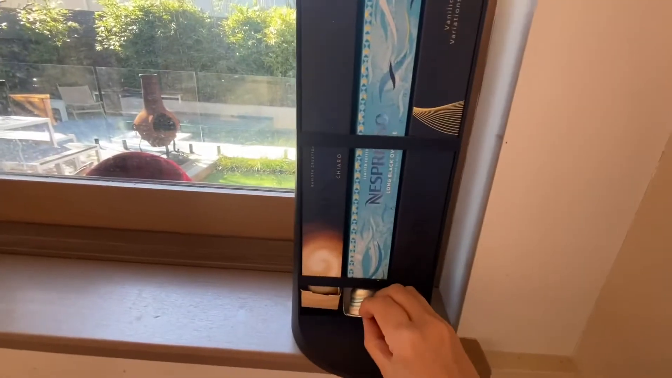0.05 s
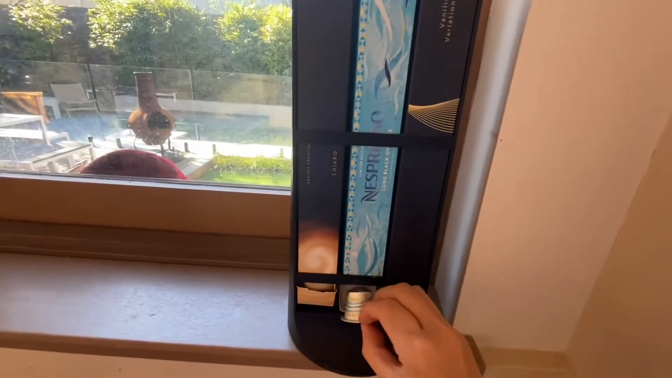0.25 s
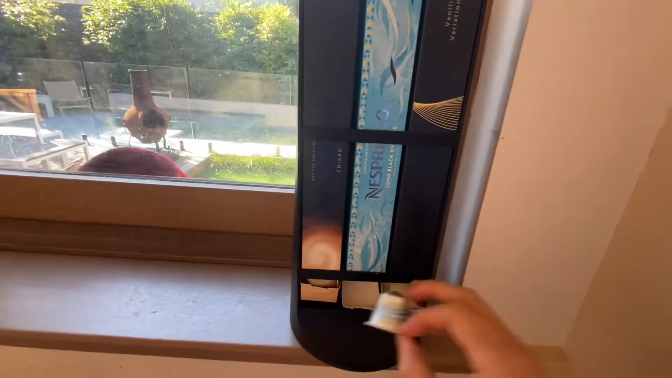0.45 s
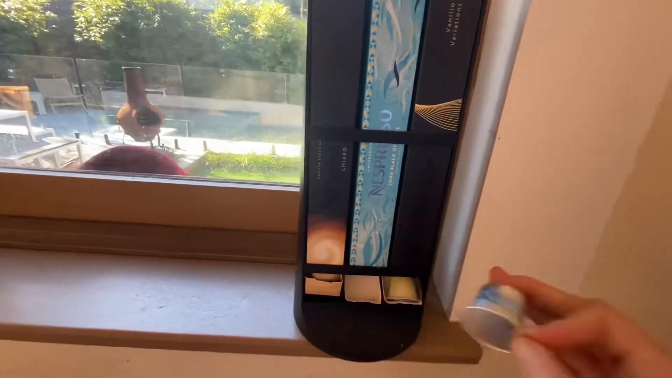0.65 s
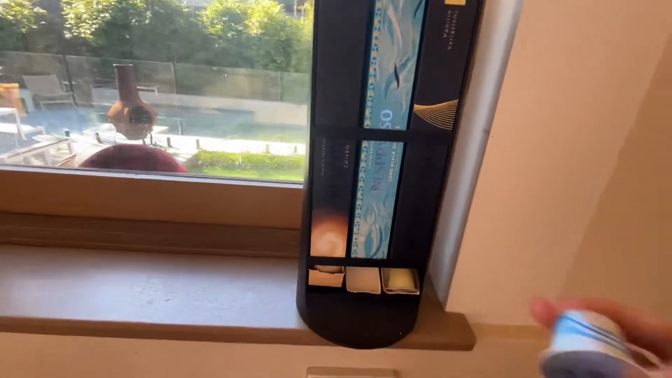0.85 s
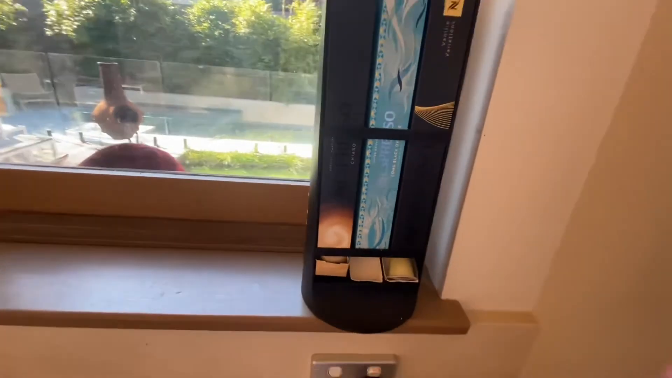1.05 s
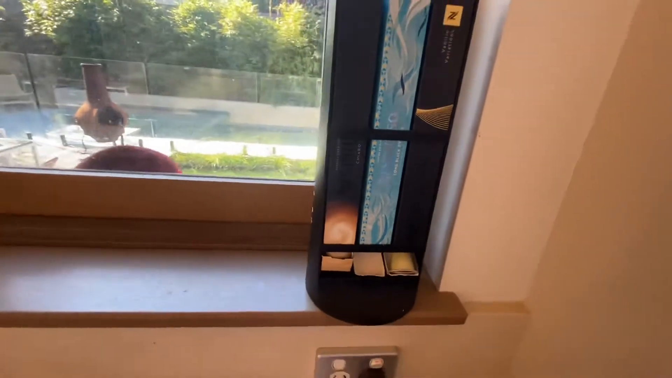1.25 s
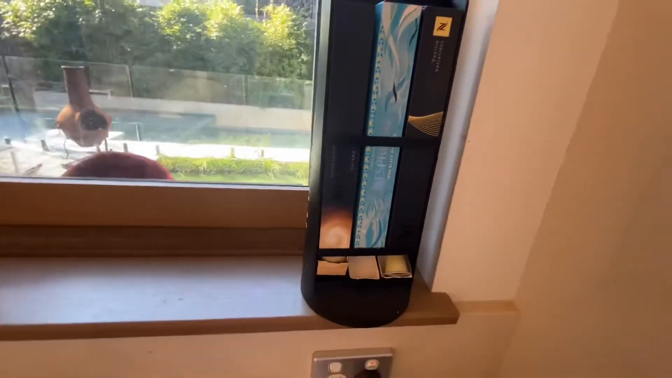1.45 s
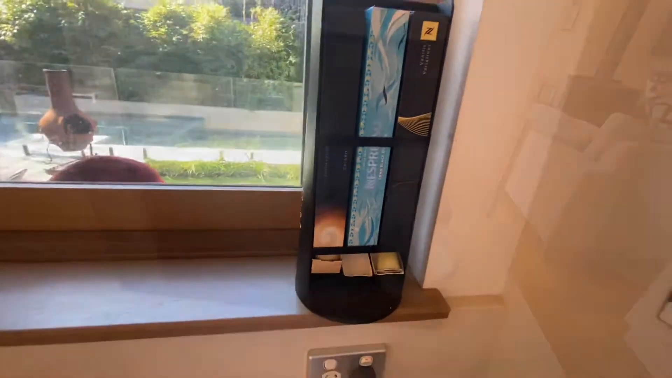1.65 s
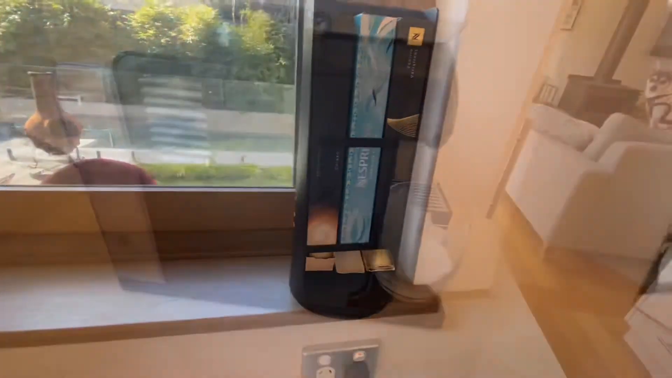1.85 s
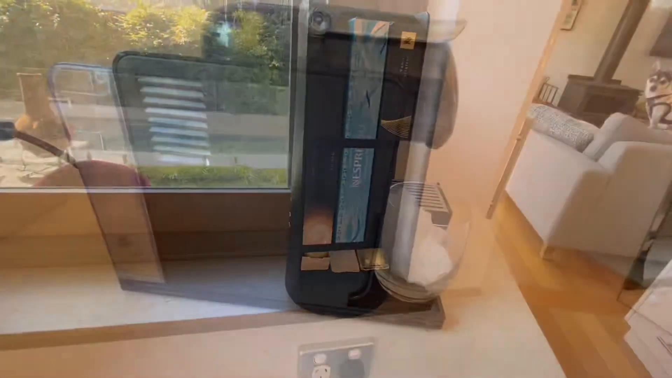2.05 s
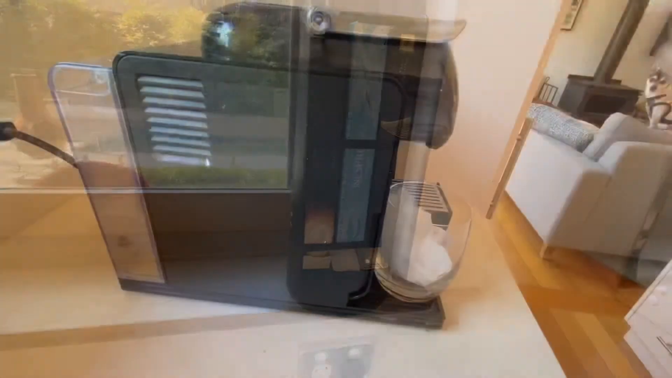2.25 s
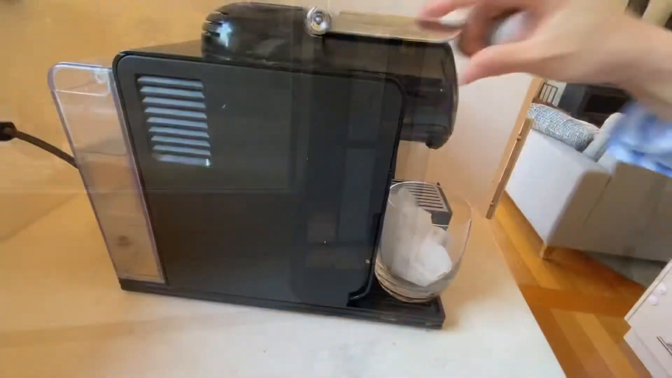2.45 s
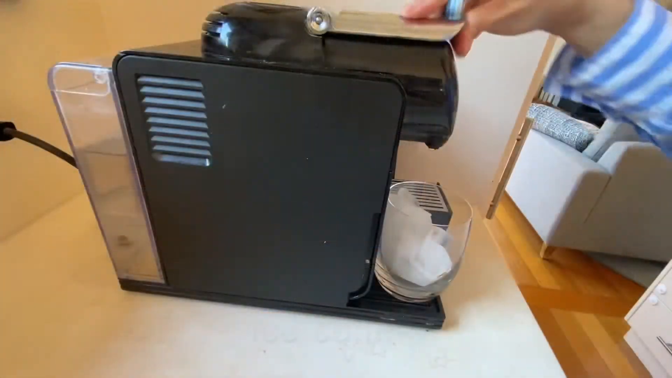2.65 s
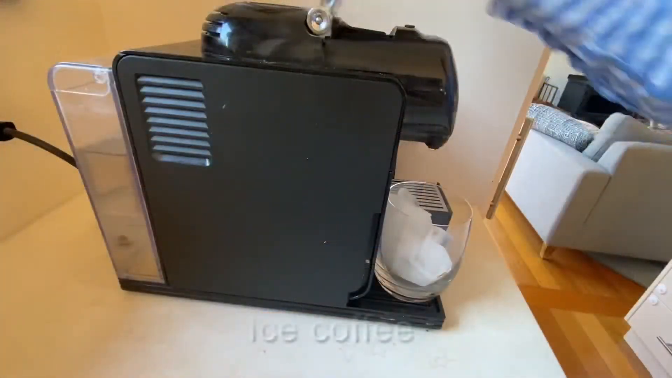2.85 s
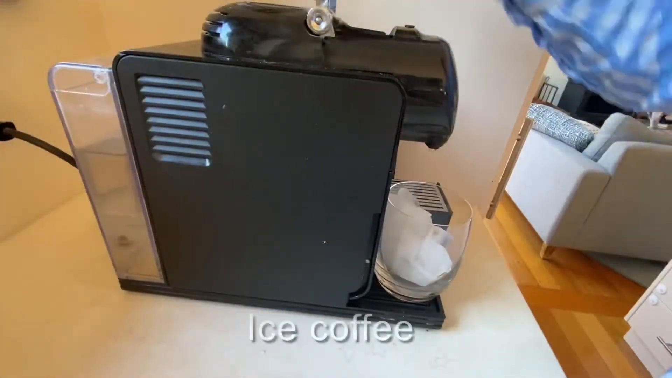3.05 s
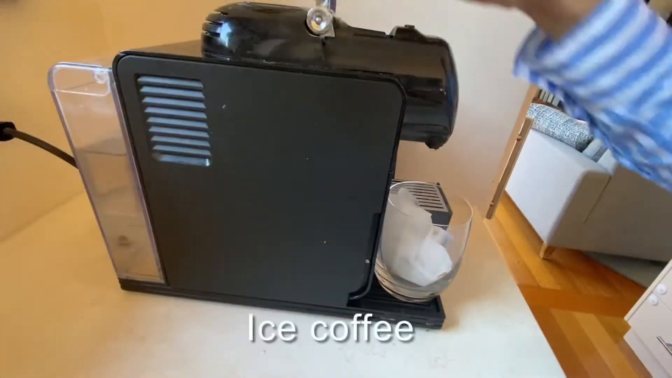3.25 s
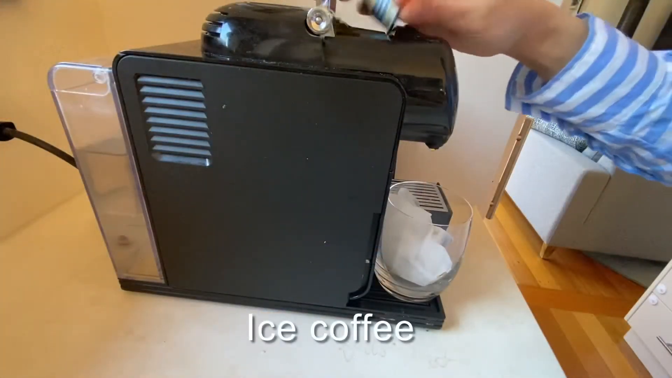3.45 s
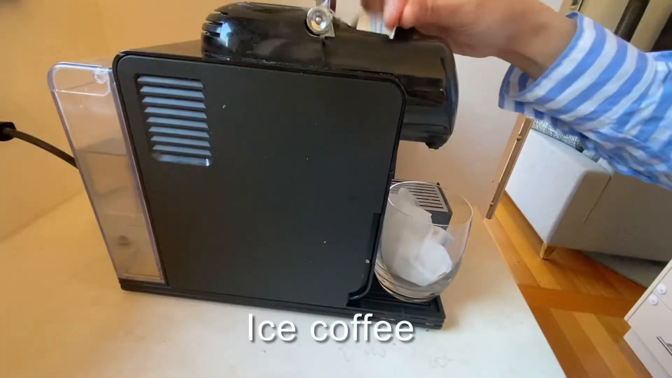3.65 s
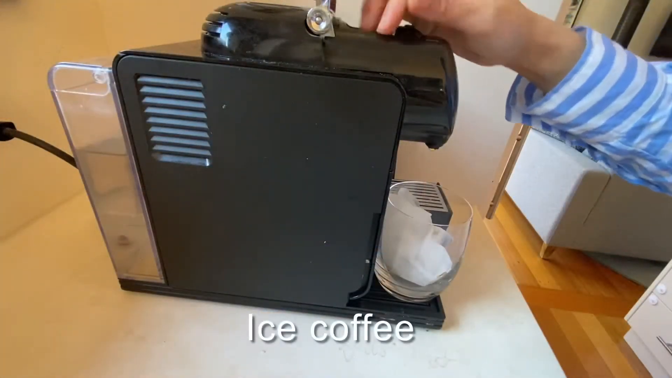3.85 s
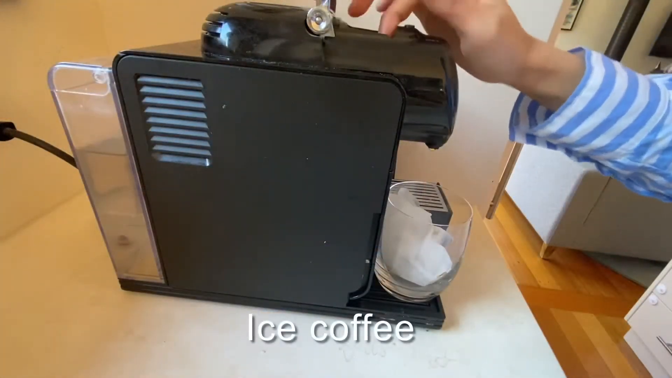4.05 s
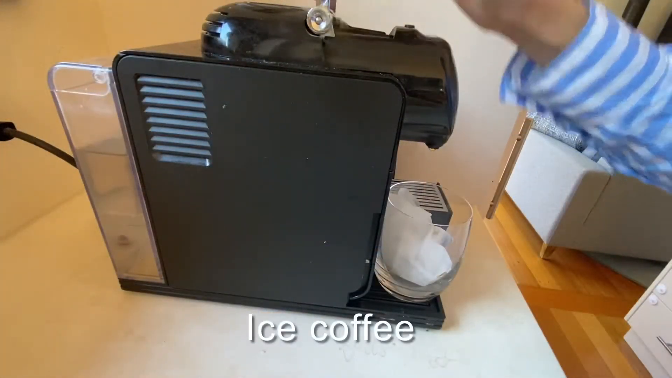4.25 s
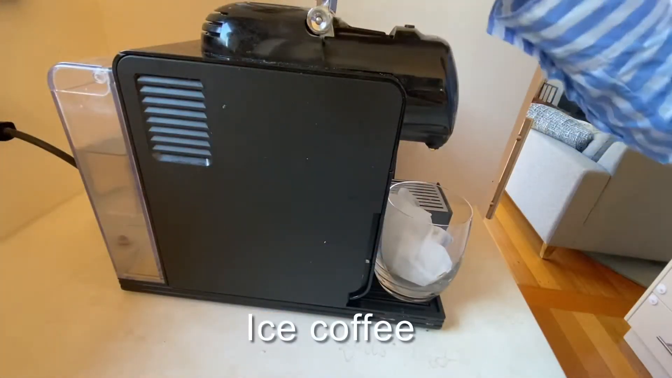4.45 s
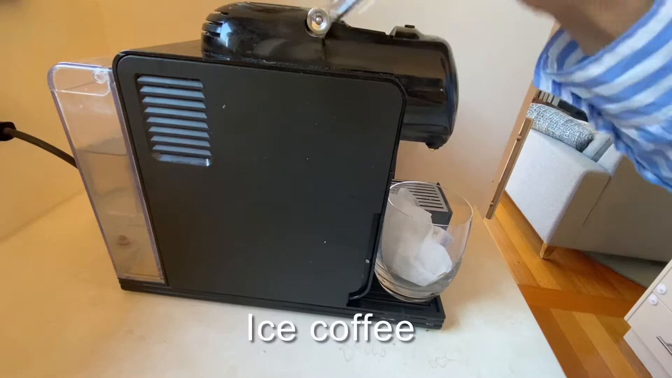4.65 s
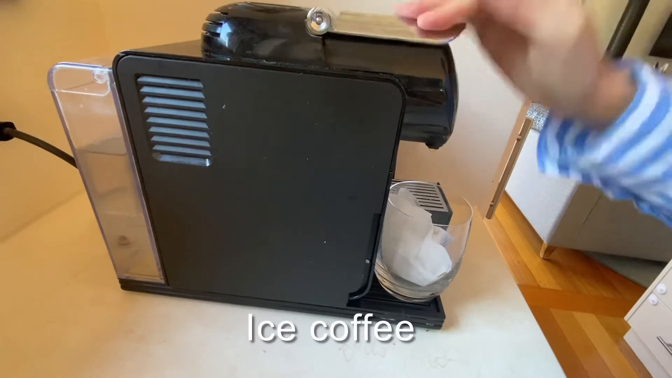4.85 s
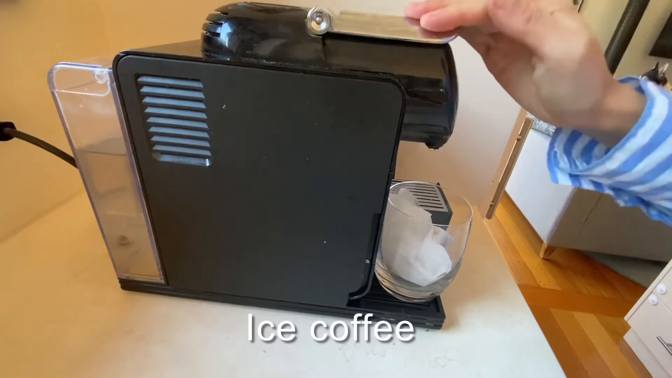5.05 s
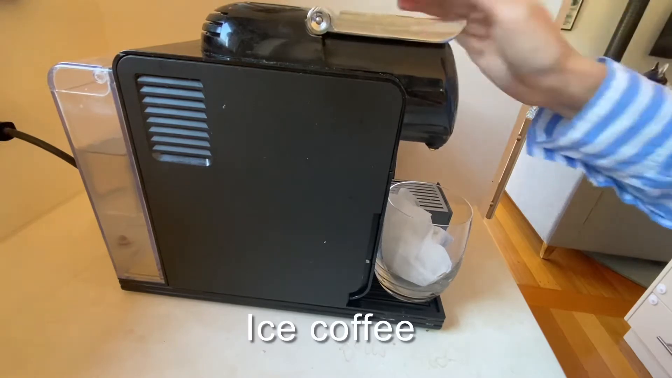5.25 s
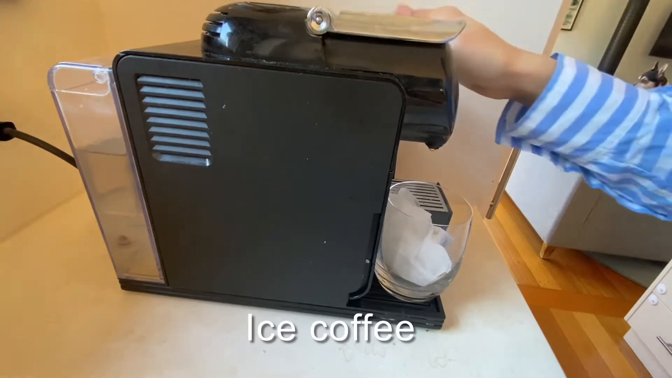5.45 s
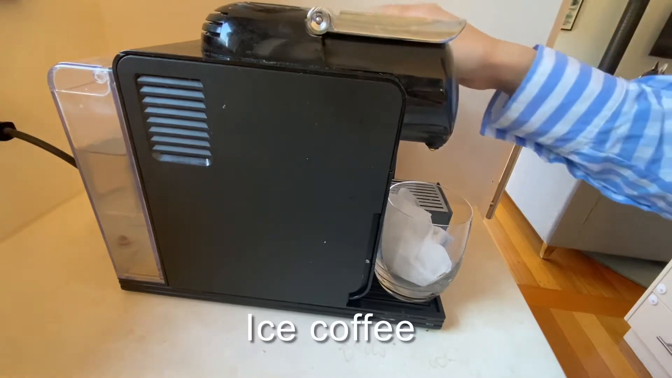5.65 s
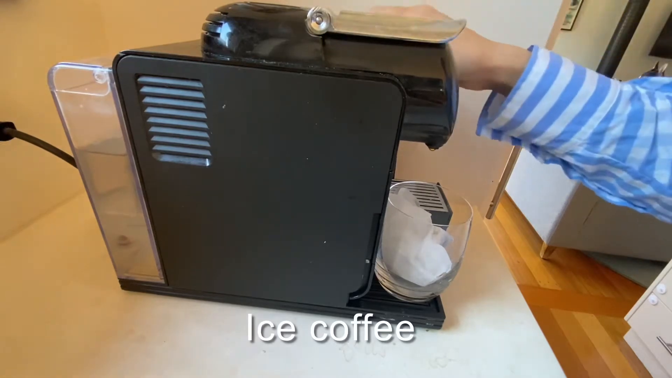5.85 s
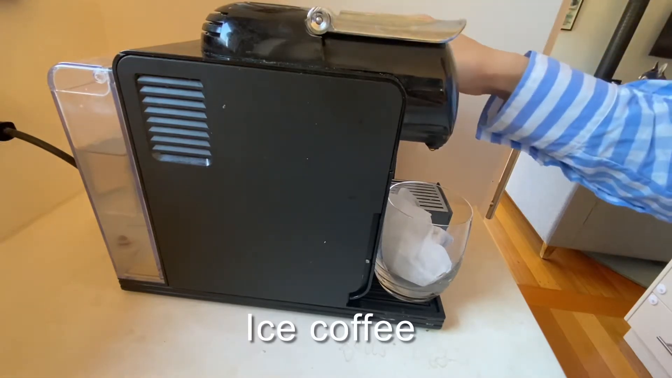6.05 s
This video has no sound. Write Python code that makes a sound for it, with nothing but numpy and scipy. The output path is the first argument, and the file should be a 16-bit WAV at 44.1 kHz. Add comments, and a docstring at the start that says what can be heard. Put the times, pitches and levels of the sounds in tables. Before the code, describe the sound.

In a quiet kitchen, a capsule knocks faintly in a plastic dispenser while a sleeve rustles and foil crinkles very softly. A coffee machine lever clicks upward and hits its stop with a sharp hollow crack. The capsule taps and rattles into the chute. The lever then clicks and creaks down, closing with the loudest clunk and a short metallic ring. A hand-held phone close by picks up low grip rumble.

```python
"""First a capsule knocks lightly in its dispenser, while fingertips brush it and a sleeve rustles close by.
Then the lever of a coffee machine is lifted, the capsule rattles into the chute and the lever is pressed
shut with a clunk. Contacts are short noise bursts that ring plastic shells; bending walls are brief sinking
tones, metal parts are decaying sines, and friction is made of many tiny kicks. All this is heard in a
kitchen from a hand-held phone, with rubs, grip rumble and quiet air as shaped noise."""
import sys
import numpy as np
from scipy import signal
from scipy.fft import rfft, irfft, next_fast_len
from scipy.io import wavfile
from scipy.ndimage import uniform_filter1d

SR = 44100
rng = np.random.default_rng(int(sys.argv[2]) if len(sys.argv) > 2 else 0)


def log_audio(samples):
    """Write samples as a 16-bit WAV file to the path given in sys.argv[1]."""
    # one column per channel
    frames = np.atleast_2d(samples).T
    # limit to full scale, then quantise
    limited = np.clip(frames, -1, 1)
    pcm = np.round(limited * 32767).astype(np.int16)
    wavfile.write(sys.argv[1], SR, pcm)


N = 269343
TIME = np.arange(N) / SR


def undb(db):
    """Decibels to gain."""
    return 10 ** (np.asarray(db) / 20)


def unit(x):
    """Scale to rms 1."""
    return x / np.sqrt(np.mean(x ** 2))


def fade(t, t60):
    """Exponential decay, 60 dB down after t60 seconds."""
    return np.exp(-np.log(1000) * t / t60)


def add(out, s, sound):
    """Mix a sound in at time s."""
    start = int(s * SR)
    out[:, start:start + sound.shape[1]] += sound[:, :N - start]


def band(x, lo_hz, hi_hz, order=3):
    """Causal band-pass."""
    edges = [lo_hz, min(hi_hz, SR / 2 - 1)]
    return signal.sosfilt(signal.butter(order, edges, "band", fs=SR, output="sos"), x)


def shape(x, hz, db):
    """Weight a sound by a curve of dB over Hz."""
    size = next_fast_len(N)
    log_hz = np.log(np.fft.rfftfreq(size, 1 / SR) + 1)  # + 1 avoids log(0)
    gain = undb(np.interp(log_hz, np.log(hz), db))
    return irfft(rfft(x, size) * gain, size)[..., :N]


def colour(x, points):
    """Shape a sound by (Hz, dB) points; rms 1."""
    return unit(shape(x, *np.transpose(points)))


def pair(size, likeness):
    """Noise at the two microphone ports, partly shared."""
    shared = np.clip(likeness, 0, 1)
    noise = rng.standard_normal((3, size))
    return np.sqrt(shared) * noise[0] + np.sqrt(1 - shared) * noise[1:]


def bursts(rows, attack_s, t60):
    """Gain over time of (s, dB) events that swell up to their moment and then die away."""
    gain = 0
    for s, db in rows:
        swell = np.exp(-(np.minimum(TIME - s, 0) / attack_s) ** 2)
        gain = gain + undb(db) * swell * fade(np.maximum(TIME - s, 0), t60)
    return gain


def resonate(x, modes):
    """A shell passes the push on and rings at its resonances."""
    return x + sum(undb(db) * signal.lfilter(*signal.iirpeak(hz, hz / width, SR), x) for hz, width, db in modes)


def ringing(modes, spread, size=2 * SR):
    """Freely decaying modes; each takes about a cycle to build up and reaches the two ports with its own phase."""
    t, out = TIME[:size], 0
    for hz, db, t60 in modes:
        phase = spread * rng.standard_normal() * np.array([[0], [1]])
        rise = 1 - np.exp(-t * hz)
        out = out + undb(db) * rise * fade(t, t60) * np.sin(2 * np.pi * hz * t + phase)
    return out


SAG_S = .007  # time constant of a bent wall relaxing


def flex(hz, sag, swell_s):
    """A thin wall bends and relaxes: a few cycles that swell, sink in pitch towards hz and are damped at once."""
    t = TIME[:SR // 16]
    pitch = hz * (1 + sag * np.exp(-t / SAG_S))
    swell = (t / swell_s * np.exp(1 - t / swell_s)) ** 2  # peaks at swell_s
    return (swell * np.sin(2 * np.pi * np.cumsum(pitch) / SR))[None]


def strike(s, db, touch):
    """One contact: its time, the level of each frequency range and its decay."""
    return (s, *(db + np.array(touch[:-1])), touch[-1])


def blend(hardness, touches):
    """Harder contacts are brighter, thinner and shorter."""
    soft, hard = np.array(touches)
    return soft + np.clip(hardness, 0, 1) * (hard - soft)


# The four parts of a contact: body, knock, clack and tick. Each row: low edge in Hz, high edge in Hz,
# ring length as a multiple of the contact's, likeness at the two ports from 0 to 1.
CONTACT_RANGES = [(167, 640, 1.3, 0.8), (642, 1790, 1.2, 0.5), (1660, 4750, 1.0, 0), (6200, 15600, 0.62, 0)]


def contacts(rows, modes, skirt_db=-24, swell=.045, grain_db=1.5, grain_s=.0006):
    """Each contact is a chatter of tiny collisions that swells and dies fast; it rings the shell from body to tick."""
    out, t = np.zeros((2, N)), TIME[:SR // 4]
    table = np.array(rows)
    t60 = table[:, -1, None, None]
    # the collisions differ in strength from one moment to the next
    strength = undb(grain_db * rng.standard_normal((len(rows), 1, len(t))))
    strength = strength[..., (t / grain_s).astype(int)]
    for k, (lo_hz, hi_hz, ring, likeness) in enumerate(CONTACT_RANGES):
        # longer contacts take longer to build up
        envelope = fade(t, ring * t60) * (1 - np.exp(-t / (swell * t60)))
        chatter = np.array([pair(len(t), likeness) for _ in rows]) * envelope * strength
        skirt = undb(skirt_db) * band(chatter, lo_hz, hi_hz, order=1)  # faint sound beyond the range
        sounds = resonate(band(chatter, lo_hz, hi_hz) + skirt, modes)
        for row, sound in zip(table, sounds):
            energy = np.mean(fade(t, ring * row[-1]) ** 2)
            # start early by the build-up time
            add(out, row[0] - swell * row[-1], undb(row[1 + k]) * unit(sound) * np.sqrt(energy))
    return out


# Clicks of the linkage and the hand on the machine. Each row: time in seconds, level in dB,
# hardness from 0 to 1, ring of the shell in dB.
LEVER_CLICKS = [(2.469, -52, 0.38, -62.5), (2.603, -46, 0.73, -63), (2.695, -36.5, 0.98, -44.5),
                (2.706, -34.5, 0.06, -40.5), (2.728, -34, 0, -37), (2.757, -29.5, 0.38, -32),
                (2.771, -36, 0.01, -41), (2.791, -37, 0.12, -45.5), (2.846, -33.5, 0.3, -34),
                (2.883, -27.5, 0.52, -32.5), (4.386, -48.5, 0.05, -58), (4.417, -30.5, 0.35, -31),
                (4.456, -28.5, 0.2, -22), (4.488, -31, 0.07, -33), (4.495, -25.5, 0.48, -33.5),
                (4.553, -36.5, 0.83, -42), (4.6, -21.5, 0.4, -26.5), (4.626, -26, 0.32, -28.5),
                (4.634, -26.5, 0.53, -25.5), (4.646, -36, 0.11, -31.5), (4.669, -38.5, 0.98, -42.5),
                (4.818, -24, 0.61, -12.5), (5.534, -63, 0.06, -75), (5.835, -65, 0.01, -78)]
# How a soft and then a hard click lands. Each row: body, knock, clack and tick in dB relative to the click,
# then decay time (t60) in seconds.
LEVER_TOUCH = [(-1, 0.5, -17, -36.5, .06), (-10, -2.5, 1, 8.5, .03)]
# The lever hits its end stop, open and then shut. Each row: time in seconds, crack in dB, thud in dB,
# decay time of the thud in seconds.
STOPS = [(2.8917, -6, -27.5, .07), (4.82, -4.5, -13, .06)]
# The crack at a stop: body, knock, clack and tick in relative dB, then decay time in seconds.
CRACK_TOUCH = (-14, -6, -10.5, -14, 0.11)
# The thud at a stop: body, knock, clack and tick in relative dB; its decay depends on the stop.
THUD_TOUCH = (3, -1.5, -7.5, -24.5)
THUD_LAG_S = .006
LATCH_S, LATCH_DB, LATCH_HARDNESS = 4.852, -20, 0.78
# Resonances of the plastic housing. Each row: pitch in Hz, width in Hz, strength in dB.
HOUSING = [(285, 76, 8), (576, 13, 3.5), (735, 59, 0), (930, 110, 4), (1150, 300, -4.5), (2190, 140, -5.5),
           (4630, 360, -4), (10400, 1500, 6.5)]


def lever():
    """The linkage clicks along its travel; at each end stop a crack is followed by a thud; last the latch drops."""
    hits = [strike(s, db, blend(hardness, LEVER_TOUCH)) for s, db, hardness, _ in LEVER_CLICKS]
    for s, crack_db, thud_db, thud_t60 in STOPS:
        hits.append(strike(s, crack_db, CRACK_TOUCH))
        hits.append(strike(s + THUD_LAG_S, thud_db, (*THUD_TOUCH, thud_t60)))
    hits.append(strike(LATCH_S, LATCH_DB, blend(LATCH_HARDNESS, LEVER_TOUCH)))
    return contacts(hits, HOUSING)


FLEX_SWELL_S, FLEX_SAG = 0.0021, 0.13  # time to its peak; share by which it starts sharp
# A click flexes the housing too: middle pitch, its scatter, level relative to the click, loss when it is hard.
CLICK_HZ, CLICK_SCATTER, CLICK_DB, CLICK_HARD_DB = 733, 0.14, -4, -3.5
# The housing flexes under each stop: it gives, takes the blow and rebounds.
# Each row: time in seconds, pitch it sinks towards in Hz, level in dB.
FLEXES = [(2.884, 1100, -19), (2.8906, 873, -4), (2.893, 1354, -13.5), (2.895, 523, -17), (4.8192, 834, -2),
          (4.8234, 253, -6), (4.828, 701, -15.5)]


def knocks():
    """The hollow knock of the housing: strong at the end stops, light under each click of the linkage."""
    out = np.zeros((2, N))
    for s, hz, db in FLEXES:
        add(out, s, undb(db) * flex(hz, FLEX_SAG, FLEX_SWELL_S))
    for s, db, hardness, _ in LEVER_CLICKS:
        hz = CLICK_HZ * np.exp(CLICK_SCATTER * rng.standard_normal())
        add(out, s, undb(db + CLICK_DB + CLICK_HARD_DB * hardness) * flex(hz, FLEX_SAG, FLEX_SWELL_S))
    return out


# Modes of the shell around the linkage, before each click varies them.
# Each row: pitch in Hz, level in dB relative to the click's ring, decay time in seconds.
SHELL = [(905, -1, .06), (1230, -7, .03), (2260, -12, .022)]


def clacks(pitch_scatter=0.03, scatter_db=3.0):
    """Each click leaves a short woody ring in the shell, a little different as the linkage moves on."""
    out = np.zeros((2, N))
    for s, _, _, ring_db in LEVER_CLICKS:
        modes = []
        for hz, db, t60 in SHELL:
            varied_hz = hz * (1 + pitch_scatter * rng.standard_normal())
            modes.append((varied_hz, db + scatter_db * rng.standard_normal(), t60))
        add(out, s, undb(ring_db) * ringing(modes, spread=0.38, size=SR // 4))
    return out


# Modes of the lever's metal parts. Each row: pitch in Hz, level in dB, decay time in seconds.
METAL = [(2254, -33, 0.46), (3520, -23, 0.14), (4600, -29, 0.12), (7170, -43, 0.24), (10456, -34, 0.18)]


def latch():
    """The latch dropping home rings the lever's metal parts."""
    out = np.zeros((2, N))
    add(out, LATCH_S, ringing(METAL, spread=.5))
    return out


# Modes of the machine on the counter. Each row: pitch in Hz, relative level in dB, decay time in seconds.
STAND = [(57.7, -25.5, 0.55), (96.7, -8.5, 0.13), (116, -21.5, 0.16), (280, -18, 0.2), (295, -35, .69),
         (554, -27.5, 0.23), (882, -33.5, 0.58), (920, -36, 0.62)]
# Modes of the drip tray and the glass on it, which ring on after a jolt.
# Each row: pitch in Hz, relative level in dB, decay time in seconds.
TRAY = [(436.5, -47, 1.9), (904, -53, 1.7)]
# Jolts that rock the machine. Each row: time in seconds, strength in dB.
JOLTS = [(2.77, -21.5), (2.895, -15.5), (4.414, -23), (4.63, -22), (4.824, 0.5)]


def clunks(modes):
    """Jolts set the modes of the machine, or of its tray, ringing."""
    out = np.zeros((2, N))
    rocking = ringing(modes, spread=.2)
    for s, db in JOLTS:
        add(out, s, undb(db) * rocking)
    return out


# The capsule knocks in the dispenser and tumbles down the chute. Each row: time in seconds, level in dB,
# hardness from 0 to 1, ping of the lid in dB.
CAPSULE_BUMPS = [(0.08, -52.5, 0.1, -52), (0.228, -44, 0.37, -65), (0.24, -43.5, 0.61, -60),
                 (2.186, -62, 0, -51), (3.606, -33.5, 0.87, -29.5), (3.616, -40.5, 0.1, -54),
                 (3.651, -40, 0.7, -29.5), (3.669, -27, 0.83, -31), (3.683, -29.5, .95, -34),
                 (3.695, -25, .85, -39), (3.702, -35.5, .5, -31), (4.116, -46.5, 0.55, -45)]
# How a soft and then a hard bump lands. Each row: body, knock, clack and tick in relative dB,
# then decay time in seconds.
CAPSULE_TOUCH = [(-5, 1, -16, -21, 0.17), (-12.5, -5, -0.5, -2.5, .016)]
# The capsule's rim taps the mouth of the chute. Each row: time in seconds, level in dB.
RIM_TAPS = [(3.4398, -31), (3.4923, -35.5), (3.589, -29), (3.691, -27.5)]
# How a rim tap lands: body, knock, clack and tick in relative dB, then decay time in seconds.
RIM_TOUCH = (-22, -8, -18, 1, .013)
# Resonances of the chute. Each row: pitch in Hz, width in Hz, strength in dB.
CHUTE = [(425, 300, 2.5), (2348, 1800, -0.5), (3736, 1000, -3), (4810, 400, 3.5), (10300, 1500, 1)]
# The foil lid pings at a rim tap: pitch it sinks to, share it starts sharp, time to its peak, level re the tap.
PING_HZ, PING_SAG, PING_SWELL_S, PING_DB = 713, 0.72, 0.0028, -2


def capsule(tumble_hz=830, tumble_sag=.38, pitch_scatter=0.12):
    """The capsule taps with its thin rim and knocks with its whole shell; every contact pings the lid."""
    taps = [strike(s, db, RIM_TOUCH) for s, db in RIM_TAPS]
    bumps = [strike(s, db, blend(hardness, CAPSULE_TOUCH)) for s, db, hardness, _ in CAPSULE_BUMPS]
    out = contacts(taps + bumps, CHUTE, skirt_db=-24.5, grain_db=4.5)
    for s, db in RIM_TAPS:
        add(out, s, undb(db + PING_DB) * flex(PING_HZ, PING_SAG, PING_SWELL_S))
    for s, _, _, ping_db in CAPSULE_BUMPS:
        hz = tumble_hz * np.exp(pitch_scatter * rng.standard_normal())
        add(out, s, undb(ping_db) * flex(hz, tumble_sag, PING_SWELL_S))
    return out


RIM_RATTLE_DB, RIM_RATTLE_T60_S = -18, 0.12  # level relative to the tap, decay time
# Resonances of the capsule's rim. Each row: pitch in Hz, width in Hz, strength in dB.
RIM = [(5690, 180, -2), (6650, 370, -4), (8500, 1400, -4)]


def rim_rattle(grain_s=.0013):
    """After a tap the rim chatters against the chute, so its ring is short, rough and broken."""
    strength = undb(5 * rng.standard_normal(N))
    grains = pair(N, 0) * strength[(TIME / grain_s).astype(int)]
    ring = unit(resonate(grains, RIM) - grains)  # the ring alone, without the push
    return undb(RIM_RATTLE_DB) * ring * bursts(RIM_TAPS, grain_s, RIM_RATTLE_T60_S)


LOAD_DB_PER_S, LET_GO_T60_S = 45, 0.043
# Pushes on the linkage; friction grows with the load until a part gives way.
# Each row: start in seconds, end in seconds, final level in dB.
PUSHES = [(2.7, 2.879, -40), (4.408, 4.651, -41), (4.68, 4.82, -53.5)]


def load():
    """Gain of the friction: it climbs steadily through each push and collapses at the end."""
    gain = 0
    for start, end, db in PUSHES:
        climb = undb(db + LOAD_DB_PER_S * np.minimum(TIME - end, 0))
        gain = gain + (TIME > start) * climb * fade(np.maximum(TIME - end, 0), LET_GO_T60_S)
    return gain


PIERCE_S = 4.3  # from here on the lever drives a capsule


def grind(slips_per_s=1900, scatter_db=0.5, lo_hz=230, hi_hz=1250, free_db=-16, loaded_db=-7.5, scrape_hz=5000):
    """Plastic sticks and slips in its guides: uneven little kicks into the housing, harsher when pushing a capsule."""
    moments = rng.random(N) < slips_per_s / SR
    slips = moments * undb(scatter_db * rng.standard_normal(N)) * pair(N, 1.0)
    scrape = undb(np.where(TIME > PIERCE_S, loaded_db, free_db)) * band(slips, hi_hz, scrape_hz)
    push = band(slips, lo_hz, hi_hz, order=2) + scrape
    return unit(resonate(push, HOUSING)) * load()


def judder(slips_per_s=130, slip_hz=640, pitch_scatter=0.22, slip_db=4):
    """Under load the guides let go in uneven jerks; each flexes the housing at another pitch, making a creak."""
    out, force = np.zeros((2, N)), load()
    moments = np.flatnonzero((rng.random(N) < slips_per_s / SR) & (force > 1e-4))
    for i, chance in zip(moments, rng.standard_normal(N)):
        hz = slip_hz * np.exp(pitch_scatter * chance)
        add(out, i / SR, force[i] * undb(slip_db) * flex(hz, FLEX_SAG, FLEX_SWELL_S))
    return out


RUB_ATTACK_S, RUB_T60_S = 0.012, 0.12
# The foil slips under the fingers or along the chute. Each row: time in seconds, level in dB.
FOIL_RUBS = [(1.443, -61), (1.572, -55.5), (1.588, -60.5), (1.62, -62), (1.645, -60), (3.505, -77),
             (3.655, -45.5)]
# Resonances of the foil cup. Each row: pitch in Hz, width in Hz, strength in dB.
FOIL = [(4370, 1600, 11.5), (6600, 300, 14), (9400, 1300, 7)]


def crinkle(lo_hz=3400, hi_hz=11000, grain_db=3, grain_s=0.00078):
    """The foil capsule is rubbed: fine, uneven grains that ring its cup."""
    strength = undb(grain_db * rng.standard_normal(N))
    grains = pair(N, 0.16) * strength[(TIME / grain_s).astype(int)]
    return unit(resonate(band(grains, lo_hz, hi_hz), FOIL)) * bursts(FOIL_RUBS, RUB_ATTACK_S, RUB_T60_S)


SCUFF_ATTACK_S, SCUFF_T60_S = 0.043, 0.29
# Fingertips brush the dispenser, the capsule and the machine. Each row: time in seconds, level in dB.
SCUFFS = [(.13, -71.5), (1.22, -66.5), (4.16, -65)]


def scuffs(lo_hz=1050, hi_hz=2050):
    """Skin brushes over card and plastic: a soft, hollow rub that trails away."""
    return unit(band(pair(N, 0.4), lo_hz, hi_hz)) * bursts(SCUFFS, SCUFF_ATTACK_S, SCUFF_T60_S)


SLEEVE_REST_DB = -90.5
# Arm movements that rub the sleeve. Each row: time of fastest motion in seconds, length in seconds, level in dB.
REACHES = [(0.12, 0.44, -70), (0.692, 0.49, -66.5), (1.347, 0.61, -65), (2.599, 0.93, -67),
           (3.344, 0.37, -75)]


def arm_speed():
    """Gain of the rubbing: each reach speeds up and slows down in a bell shape."""
    reaches = sum(undb(db) * np.exp(-(2 * (TIME - s) / length) ** 2) for s, length, db in REACHES)
    return undb(SLEEVE_REST_DB) + reaches


# Tone of the rubbed cloth. Each row: frequency in Hz, relative level in dB.
CLOTH = [(200, -10), (700, 1), (1700, 4), (2700, 0), (10000, -7), (12000, -10.5), (13500, -27)]


def sleeve(flutter_db=1.5):
    """Fibres catch and let go: a hiss with a fine, uneven grain."""
    flutter = unit(uniform_filter1d(rng.standard_normal(N), SR // 60))
    return colour(pair(N, 0.083) * undb(flutter_db * flutter), CLOTH) * arm_speed()


GRIP_ATTACK_S, GRIP_T60_S, GRIP_REST_DB = 0.048, 1, -75
# The hand shifts its grip on the phone. Each row: time in seconds, level in dB.
GRIPS = [(.16, -60), (.71, -55.5), (1.04, -51.5), (1.11, -62.5), (1.31, -76), (2.19, -63), (2.48, -56),
         (3.125, -44.5), (3.29, -51)]
# Tone of the hand's rumble. Each row: frequency in Hz, relative level in dB.
RUMBLE = [(25, -12), (55, 5), (80, -5.5), (150, -14.5), (400, -55)]


def handling():
    """The hand rumbles straight into the phone: a low noise that swells at each shift of grip."""
    grip = undb(GRIP_REST_DB) + bursts(GRIPS, GRIP_ATTACK_S, GRIP_T60_S)
    return colour(pair(N, 0.97), RUMBLE) * grip


AIR_DB = -64
# Tone of the quiet kitchen. Each row: frequency in Hz, relative level in dB.
AIR = [(30, -21), (54, -5), (88, 4), (130, -5), (300, -22.5), (2500, -39), (7000, -40.5), (11500, -51),
       (14000, -61.5)]


def quiet_air():
    """The quiet kitchen: a steady, mostly low noise, nearly separate at the two ports."""
    return undb(AIR_DB) * colour(pair(N, 0.19), AIR)


# Kitchen reverberation. Each row: frequency in Hz, relative level in dB, decay time in seconds.
KITCHEN = [(79.6, -22.5, 0.89), (286, -10, 0.73), (555, -13.5, 0.8), (2050, -14, 0.79), (4600, -10, 0.64),
           (7800, -20.5, 0.93), (12000, -32.5, 0.8)]


def kitchen(x, early_db=-11, early_t60=0.27, gap_s=0.0067, build_s=0.0038):
    """Quick reflections from counter and walls, and a diffuse tail whose decay time varies with frequency."""
    t = TIME[:SR]
    hz, db, t60 = np.transpose(KITCHEN)
    edges = np.geomspace(40, 17000, 13)
    noise, tail = rng.standard_normal((2, SR)), 0
    for lo, hi in zip(edges, edges[1:]):
        where = np.log(lo * hi) / 2  # middle of the band on a log scale
        envelope = fade(t, np.interp(where, np.log(hz), t60)) * (1 - np.exp(-t / build_s))
        gain = undb(np.interp(where, np.log(hz), db))
        tail = tail + gain * band(rng.standard_normal((2, SR)), lo, hi) * unit(envelope)
    early = undb(early_db) * band(noise * unit(fade(t, early_t60) * (t > gap_s)), 170, 14000, order=1)
    return signal.fftconvolve(x, (early + tail) / np.sqrt(SR), axes=1)[:, :N]


def left_leads(x, lag_s=.0003):
    """The sound reaches the right port a little later."""
    return np.array([x[0], np.interp(TIME - lag_s, TIME, x[1])])


# The phone's two ports. Each row: frequency in Hz, response in dB, left minus right in dB.
PORTS = [(90, 3, 3), (280, 1.5, -3.5), (900, -1, 3.5), (2150, 0, 1.5), (4450, -3, 3.5), (6600, 3.5, 3.5),
         (9650, -2, -5), (11860, -1, -1), (13300, -13, -0.5), (15000, -5.5, 0.5)]


def ports(x):
    """The side facing the machine hears more of its midrange; both ports have a dip in the top treble."""
    hz, db, left_db = np.transpose(PORTS)
    return np.array([shape(x[0], hz, db + left_db / 2), shape(x[1], hz, db - left_db / 2)])


def scene(latch_room_db=-7):
    """The machine stands a little to the left, its metal lever and tray facing the phone, so they echo less."""
    machine = lever() + knocks() + clacks() + clunks(STAND)
    machine = machine + capsule() + rim_rattle() + grind() + judder()
    metal = latch() + clunks(TRAY)
    direct = left_leads(machine + metal)
    sound = ports(direct + kitchen(machine + undb(latch_room_db) * metal))
    return sound + crinkle() + scuffs() + sleeve() + handling() + quiet_air()


TOP_HZ = 16300


def record(dry, low_cut_hz=36):
    """The phone drops the deepest bass, rounds the loudest peaks and cuts the top."""
    sound = signal.sosfilt(signal.butter(2, low_cut_hz, "high", fs=SR, output="sos"), dry)
    return signal.sosfilt(signal.ellip(8, .2, 70, TOP_HZ, fs=SR, output="sos"), np.tanh(sound))


dry = scene()
out = record(dry)
log_audio(out)
```